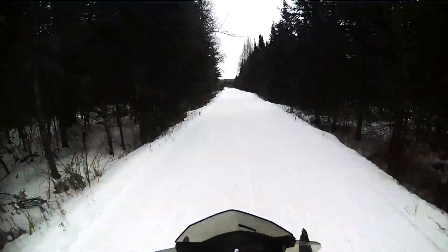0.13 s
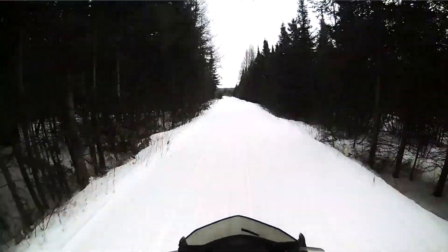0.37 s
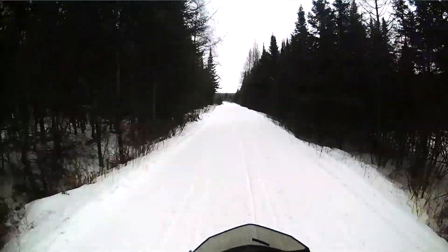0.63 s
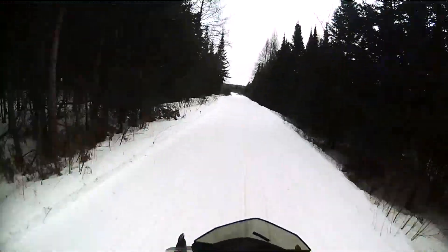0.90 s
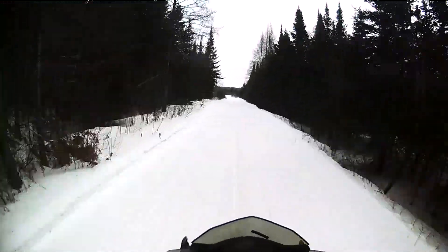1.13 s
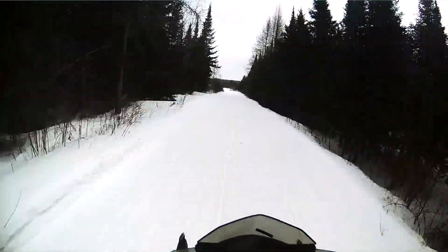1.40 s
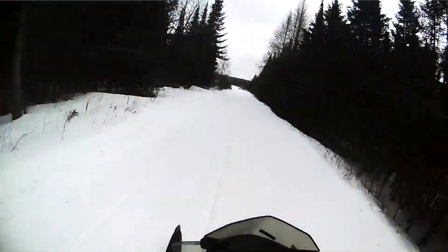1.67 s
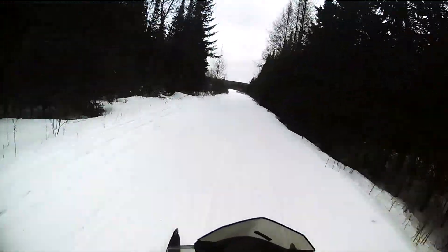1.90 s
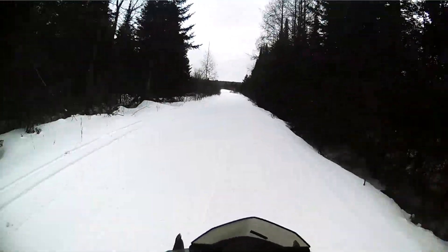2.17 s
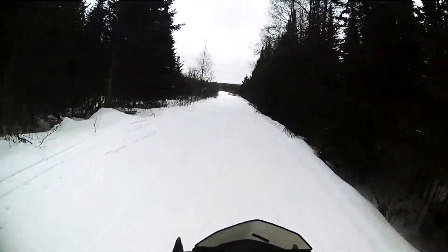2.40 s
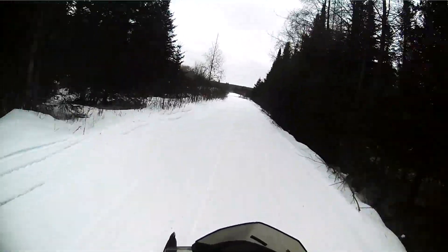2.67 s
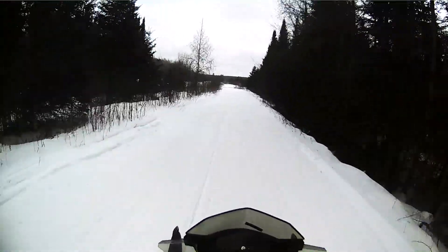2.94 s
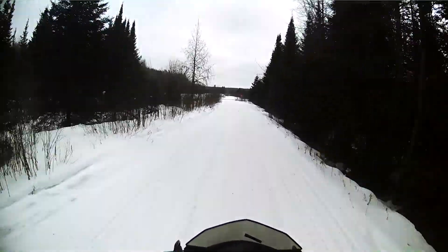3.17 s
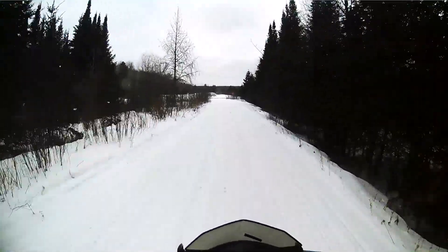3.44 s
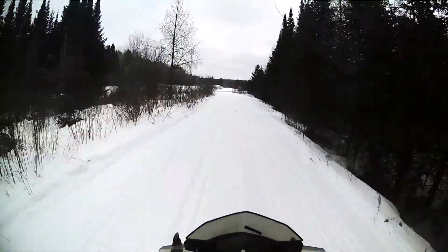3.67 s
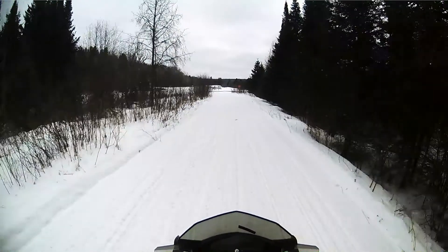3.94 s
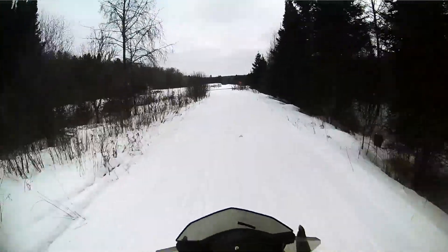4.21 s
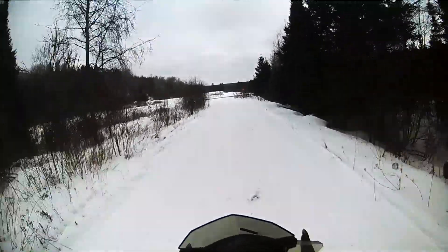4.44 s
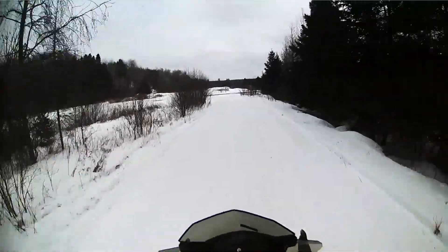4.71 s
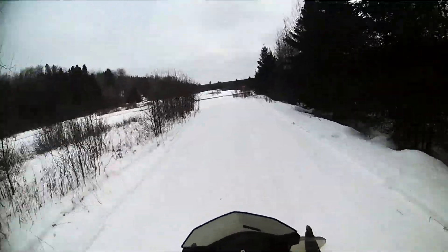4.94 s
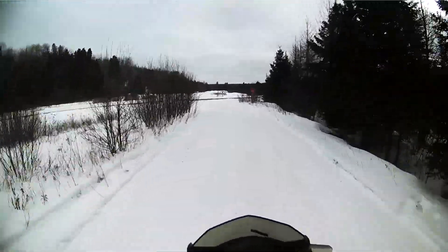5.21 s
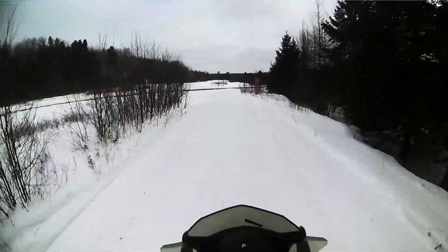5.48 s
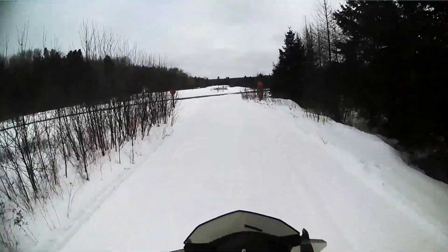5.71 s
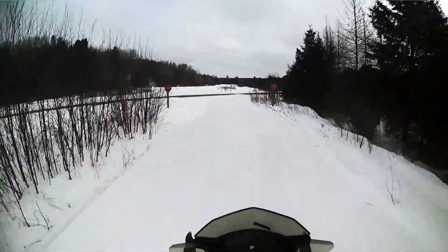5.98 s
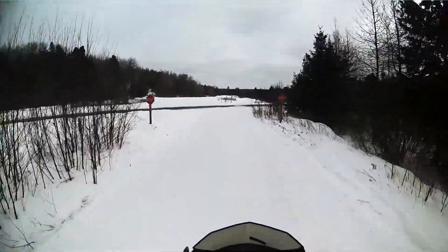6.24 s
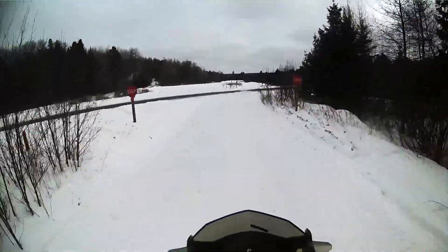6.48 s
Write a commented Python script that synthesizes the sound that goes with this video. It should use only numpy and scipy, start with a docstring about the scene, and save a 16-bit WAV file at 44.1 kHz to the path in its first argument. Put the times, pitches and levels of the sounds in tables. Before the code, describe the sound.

From a rider's helmet on an open snowy trail, a snowmobile coasts down. A raspy track whine dominates at first, then sinks steadily in pitch over a low idling engine. Violent headwind thumps and roars, overloading the small microphone into constant crackling, blocky distortion. Gusts crowd the first few seconds; later the wind thins and the lower whine and engine hum show through more clearly.

```python
"""On a forest trail a snowmobile coasts down, heard from the rider's helmet in its own headwind.
The lugs of the track whine lower and lower, as a tone and its octave, over the engine idling down, a sum
of crank orders. Bands of noise that weaken with the speed are the wind buffeting the microphone.
All of it drives the small recorder far past its limit, so the sound flips between two rails."""
import sys
import numpy as np
from scipy import signal
from scipy.fft import rfft, irfft, next_fast_len
from scipy.io import wavfile
from scipy.ndimage import uniform_filter1d

SR = 44100
rng = np.random.default_rng(int(sys.argv[2]) if len(sys.argv) > 2 else 0)


def bounce(signal):
    """Save signal as a 16-bit WAV file at the path given by the first command-line argument."""
    frames = np.transpose(np.atleast_2d(signal))
    limited = np.clip(frames, -1, 1)
    pcm = np.round(limited * 32767).astype(np.int16)
    wavfile.write(sys.argv[1], SR, pcm)


def boost(x):
    """Linear amplitude factor 10**(x/20) for a level x in decibels (scalar or array-like)."""
    u = np.asarray(x, float) / 20
    return 10 ** u


N = 291479  # samples

# Ground speed, counted in track lugs. Each row: time in seconds, lugs per second in Hz.
LUG_RATE = [(0, 344), (.8, 315), (1.8, 282), (3, 245.5), (3.55, 229.9), (3.7, 223.5), (4.2, 211.5),
            (4.8, 197), (5.6, 171.5), (6.1, 153.5), (6.61, 133)]
# Whine at the lug rate. Each row: time in seconds, mean level in dB.
WHINE_LEVEL = [(0, 26.5), (.28, 23), (.4, 15.5), (1.15, 14.5), (1.25, 1), (1.5, 14), (2.6, 11), (2.7, 9.5),
               (3.3, 11), (3.55, 7), (3.63, 16.5), (3.85, 15.5), (4.4, 16.5), (5.3, 10), (5.6, 14.5),
               (5.85, 10.5), (6.61, 6)]
# Octave above the whine. Each row: time in seconds, mean level in dB.
OCTAVE_LEVEL = [(0, 1.5), (3.5, 0), (4.4, 3), (5.82, -2), (5.88, 11), (6.2, 1), (6.61, 7.5)]

# Engine idling down. Each row: time in seconds, crank turns per second in Hz, mean level in dB.
CRANK = [(0, 84.48, 7), (2, 80.36, 5), (3.3, 78.97, 10.5), (3.7, 78.19, 6.5), (5, 74.15, 7),
         (6.1, 69.28, 4), (6.61, 66.3, 5.5)]
# Engine harmonics, two firings a turn. Each row: multiple of the crank rate, relative level in dB.
CRANK_ORDERS = [(1, -3), (2, 0), (3, -12), (4, -4), (6, -12)]

# Colour of the wind's thumping on the microphone. Each row: frequency in Hz, relative level in dB.
BUFFET_SPECTRUM = [(5, -30), (20, -14), (45, -4), (100, -3), (200, -7), (400, -15.5), (800, -48.5)]
# Colour of the finer eddies. Each row: frequency in Hz, relative level in dB.
ROAR_SPECTRUM = [(100, -20), (250, 0.5), (450, -3.5), (900, -6), (1800, -17), (4000, -32.5), (9000, -56)]
# Gusts. Each row: centre in seconds, length in seconds, rise of the buffeting and surges in dB,
# rise of the roar in dB, rise of the helmet drone in dB (negative: a fall).
GUSTS = [(0.109, .4, 4.5, 8.5, 6), (0.444, 0.66, 10.5, 7, 4), (0.746, 0.34, 5.5, 3.5, 6),
         (1.226, .15, 3.5, 0, 6.5), (1.542, .3, 4.5, 3, 0.5), (1.907, 0.52, 3, 0, -1.5),
         (2.164, 0.09, 2.5, -2, 6), (4.256, 0.33, -3.5, 3, -5.5), (2.64, 0.4, 3.5, 6.5, 5),
         (3.147, 0.16, 3, 5, 8.5), (3.395, 0.073, 8, 3, 6.5), (3.652, 0.21, -0.5, 5, 2.5),
         (5.191, 0.17, -0.5, -2.5, 3.5), (5.751, 0.36, -2.5, -4, 8), (6.355, 0.39, -1.5, 6, 1)]

# Treble response of the converter, apart from its pair averaging. Each row: frequency in Hz, gain in dB.
CONVERTER_RESPONSE = [(500, 1), (1000, -2.5), (2000, -4), (3000, -5), (3700, -5), (3900, -15), (4100, -14),
                      (4300, -10), (5000, -9), (6000, -10.5), (7000, -12.5), (7800, -16), (8600, -29),
                      (10000, -44), (13000, -55)]

# Wind levels at the cruising lug rate, outside gusts, and their growth per doubling of speed
CRUISE_HZ = 250
SURGE_DB, SURGE_DB_PER_DOUBLING = 6, 23
BUFFET_DB, BUFFET_DB_PER_DOUBLING = 13, 8
ROAR_DB, ROAR_DB_PER_DOUBLING = 9, 15.5
DRONE_DB, DRONE_DB_PER_DOUBLING = 10, 11.5
SURGE_HZ = 48.4  # peak of the deep pressure surges
DRONE_HZ, DRONE_WIDTH_HZ = 84.1, 11.9  # helmet resonance and its width at half amplitude

# Limits of the recorder's stages, as sample amplitudes
RAIL, CEILING, FULL_SCALE = .63, .75, .70
KNEE = 10  # exponent: higher turns more sharply into the rail
COUPLING_HZ = 21  # corner of the coupling capacitor
GRAIN_DB, GRAIN_MS = 4.5, 20  # rounding noise above the mean slope, and the window of that mean
GRAIN_FROM_HZ = 830  # the rounding noise thins out below this
PAIR_HZ = 4000  # samples averaged in pairs cancel this frequency


def evened(x):
    """Normalization: scales to rms 1."""
    return x / np.sqrt(np.mean(x ** 2) + 1e-20)


def read(points, hz):
    """Logarithmic frequency scale: interpolates a spectrum along it."""
    f, value = np.transpose(points)
    return np.interp(np.log(hz + 1), np.log(f + 1), value)


def columns(rows):
    """Linear interpolation: every column after the time, sample by sample."""
    s, *values = np.transpose(rows)
    return [np.interp(np.arange(N) / SR, s, v) for v in values]


def noise(gain):
    """Spectral shaping: white noise takes the colour gain(hz), at rms 1."""
    size = next_fast_len(N)
    spectrum = rfft(rng.standard_normal(size))
    coloured = irfft(spectrum * gain(np.fft.rfftfreq(size, 1 / SR)), size)
    return evened(coloured[:N])


def chance(hz):
    """Low-passed randomness: a wander of rms 1, up to about hz."""
    return noise(lambda f: 1 / (1 + (f / hz) ** 2))


def track():
    """Periodic impact: lugs meet the sprocket at a rate set by ground speed; bumps make the tone waver."""
    (hz,), (whine_db,), (octave_db,) = columns(LUG_RATE), columns(WHINE_LEVEL), columns(OCTAVE_LEVEL)
    wavering_hz = hz * (1 + .007 * chance(hz=11.88))
    angle = 2 * np.pi * np.cumsum(wavering_hz) / SR
    whine = boost(whine_db) * np.sin(angle)
    octave = boost(octave_db) * np.sin(2 * angle + 1)
    return np.sqrt(2) * (whine + octave) * boost(2.24 * chance(hz=19.5))  # root 2: levels are rms


def engine():
    """Harmonic series: low orders of the crank speed, uneven from turn to turn off the throttle."""
    hz, level_db = columns(CRANK)
    uneven_hz = hz * (1 + .006 * chance(hz=8.06))
    angle = 2 * np.pi * np.cumsum(uneven_hz) / SR
    orders = sum(boost(db) * np.sin(k * angle + k * k) for k, db in CRANK_ORDERS)
    return np.sqrt(2) * orders * boost(level_db + 1.57 * chance(hz=9.8))


def wind():
    """Turbulence and resonance: eddies thump and roar, the helmet opening hums like a blown bottle."""
    doublings = np.log2(columns(LUG_RATE)[0] / CRUISE_HZ)
    thump_db, swell_db, hum_db = gusts()
    surge_db = SURGE_DB + SURGE_DB_PER_DOUBLING * doublings + thump_db
    buffet_db = BUFFET_DB + BUFFET_DB_PER_DOUBLING * doublings + thump_db
    roar_db = ROAR_DB + ROAR_DB_PER_DOUBLING * doublings + swell_db
    drone_db = DRONE_DB + DRONE_DB_PER_DOUBLING * doublings + hum_db

    surge = noise(lambda f: f ** 2 / (SURGE_HZ ** 2 + f ** 2) ** 2)
    buffet = noise(lambda f: boost(read(BUFFET_SPECTRUM, f)))
    roar = noise(lambda f: boost(read(ROAR_SPECTRUM, f)))
    drone = noise(lambda f: 1 / (1 + (2 * (f - DRONE_HZ) / DRONE_WIDTH_HZ) ** 2))

    # all but the drone also wander in level
    surge *= boost(surge_db + 1.05 * chance(hz=12))
    buffet *= boost(buffet_db + 0.92 * chance(hz=9.4))
    roar *= boost(roar_db + 1.1 * chance(hz=60))
    drone *= boost(drone_db)
    return surge + buffet + roar + drone


def gusts():
    """Gaussian envelopes: bell-shaped changes in dB for buffeting, roar and drone."""
    t = np.arange(N) / SR
    total = 0
    for centre, length, *rises_db in GUSTS:
        bell = np.exp(-(2 * (t - centre) / length) ** 2)
        total = total + np.outer(rises_db, bell)
    return total


def scene():
    """Superposition: the pressures of all sources add at the microphone."""
    return (track() + engine() + wind())[None]


def band_limit(x):
    """A steep low-pass at the top of the band."""
    return signal.sosfilt(signal.butter(12, 15850, fs=SR, output="sos"), x)


def record(dry):
    """Saturation: the preamplifier hits its rails, then the converter clips, rounds and dulls."""
    railed = RAIL * dry / (1 + abs(dry) ** KNEE) ** (1 / KNEE)

    # a coupling capacitor makes the flat tops sag
    keep = np.exp(-2 * np.pi * COUPLING_HZ / SR)
    sagging = signal.lfilter([1, -1], [1, -keep], railed)
    clipped = np.clip(sagging, -CEILING, CEILING)

    # rounding steps grow with busy sound
    slope = abs(np.gradient(clipped, axis=1))
    step = uniform_filter1d(slope, round(GRAIN_MS * SR / 1000))
    grain = noise(lambda f: f ** 2 / (f ** 2 + GRAIN_FROM_HZ ** 2))
    grainy = clipped + boost(GRAIN_DB) * step * grain

    size = next_fast_len(N + SR)
    hz = np.fft.rfftfreq(size, 1 / SR)
    pair_average = np.cos(np.pi * hz / (2 * PAIR_HZ))
    response = boost(read(CONVERTER_RESPONSE, hz)) * pair_average
    dulled = irfft(rfft(grainy, size) * response, size)[:, :N]

    # the ringing of the steepest edges is shaved off again
    finished_mix = np.clip(dulled, -FULL_SCALE, FULL_SCALE)
    return band_limit(finished_mix)


dry = scene()
out = record(dry)
bounce(out)
```